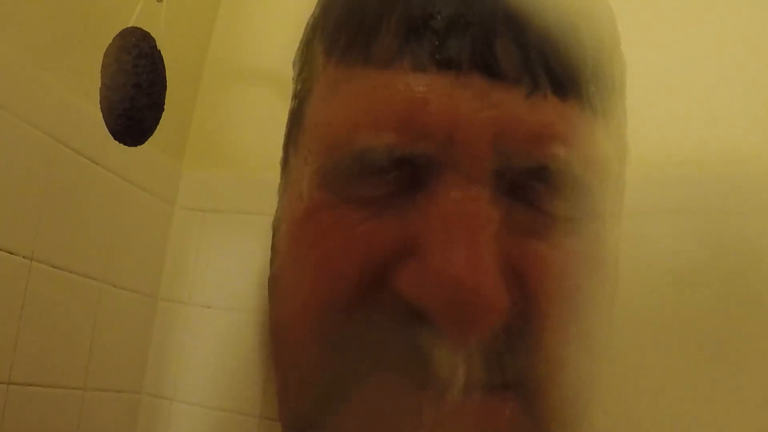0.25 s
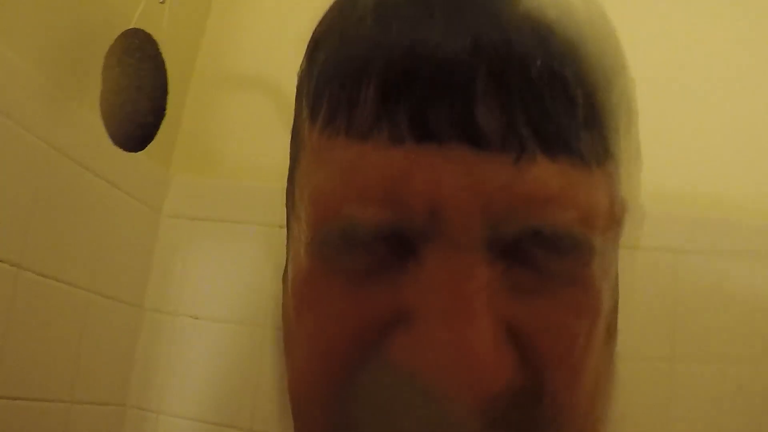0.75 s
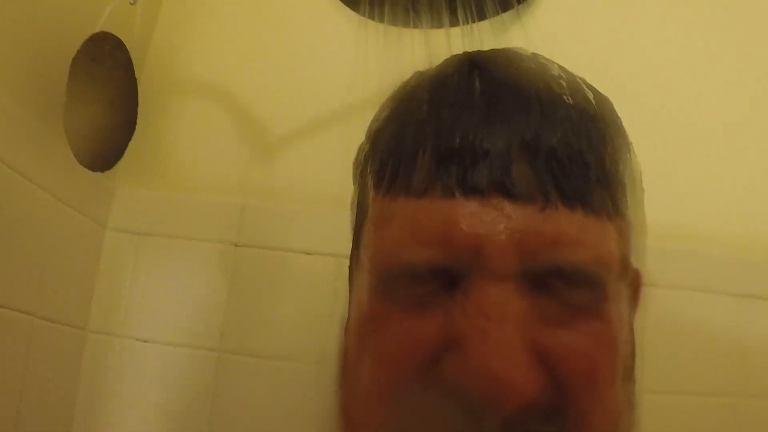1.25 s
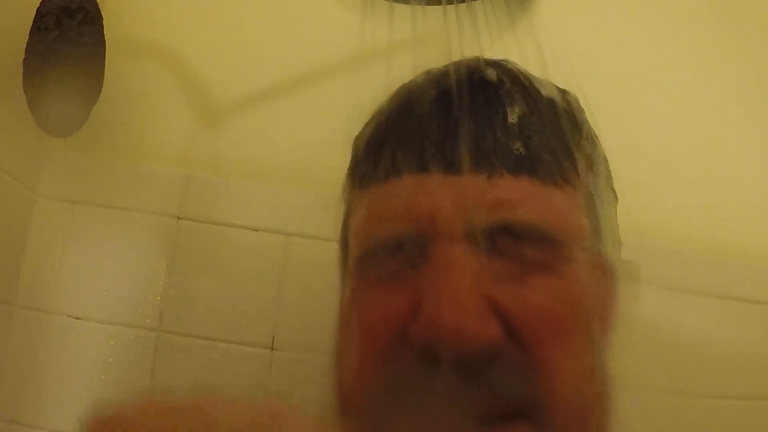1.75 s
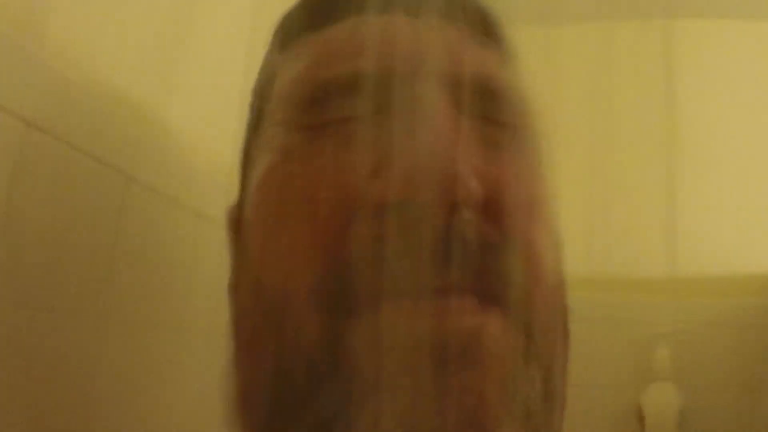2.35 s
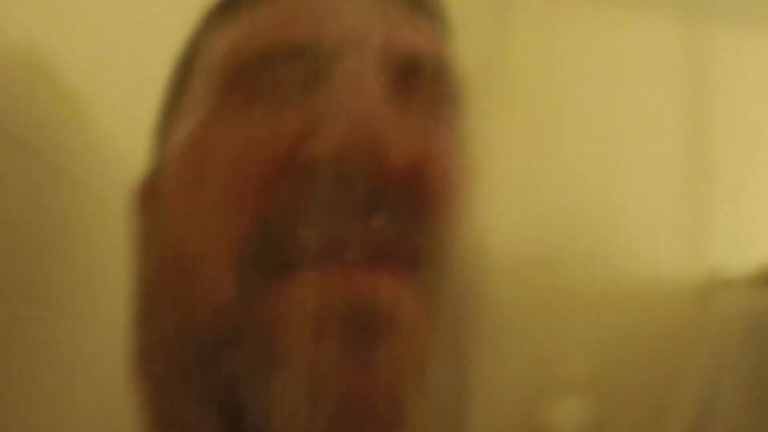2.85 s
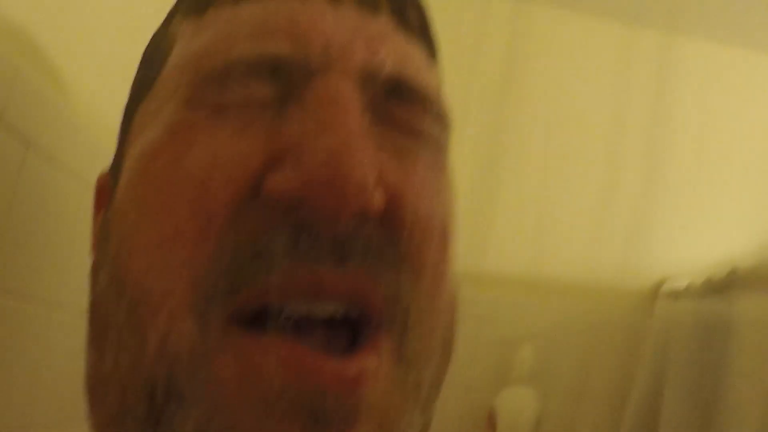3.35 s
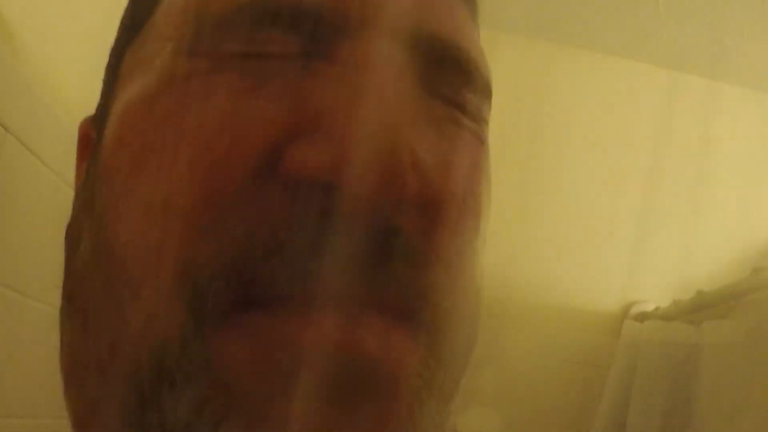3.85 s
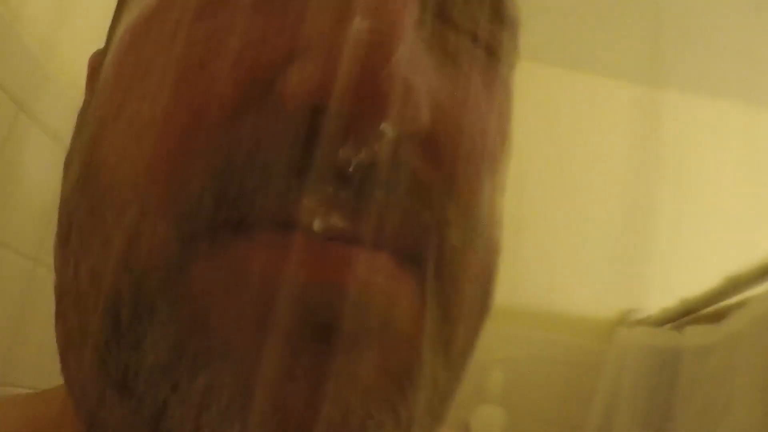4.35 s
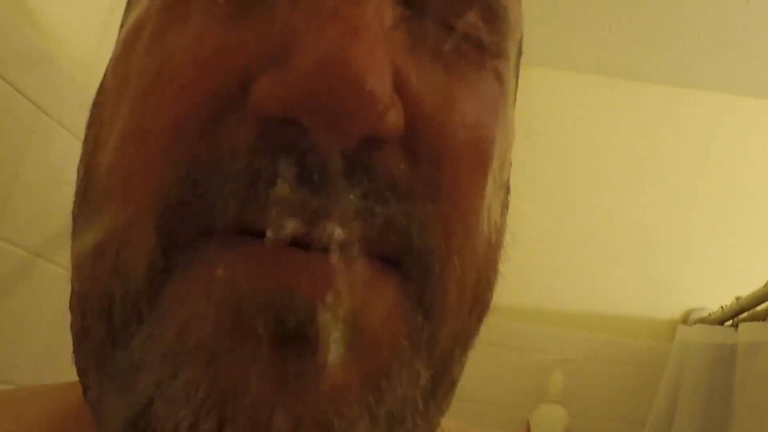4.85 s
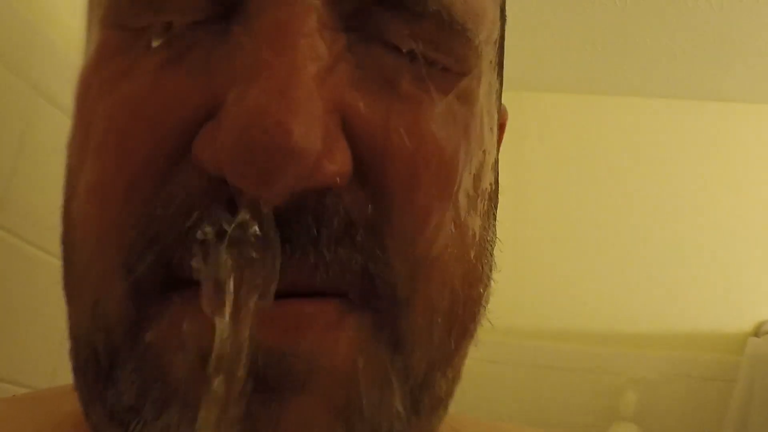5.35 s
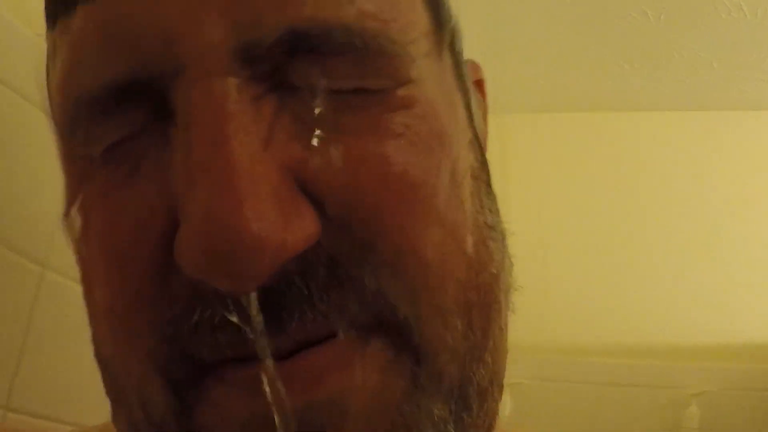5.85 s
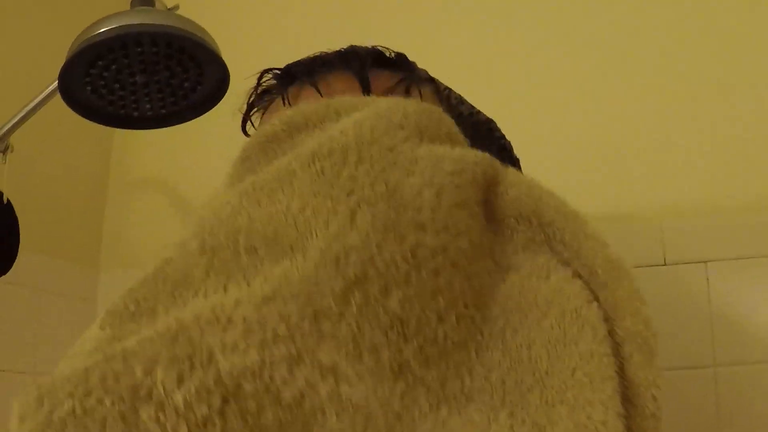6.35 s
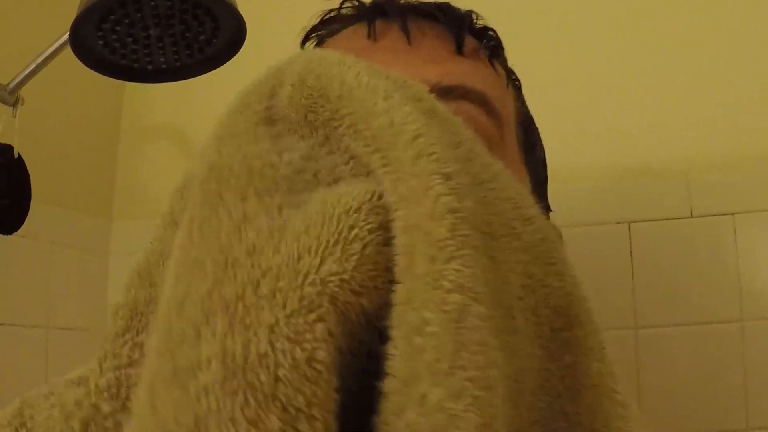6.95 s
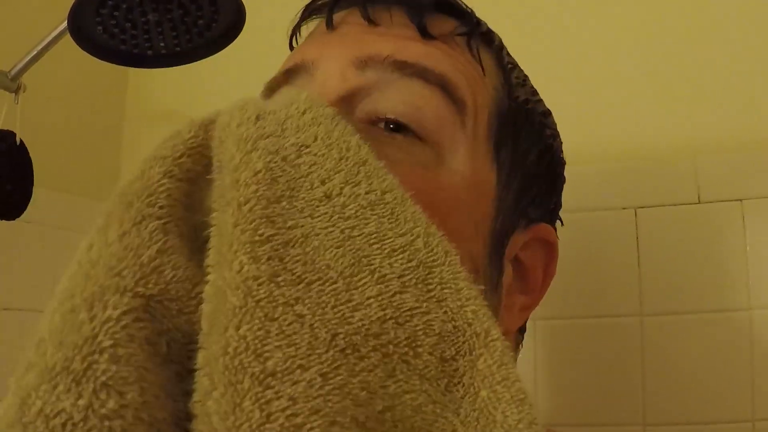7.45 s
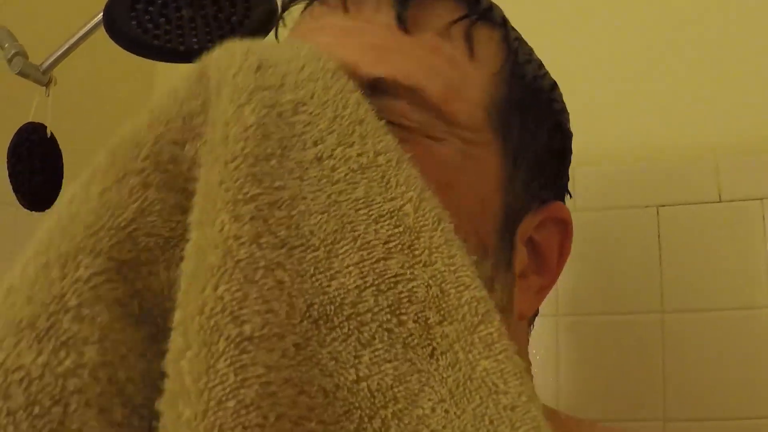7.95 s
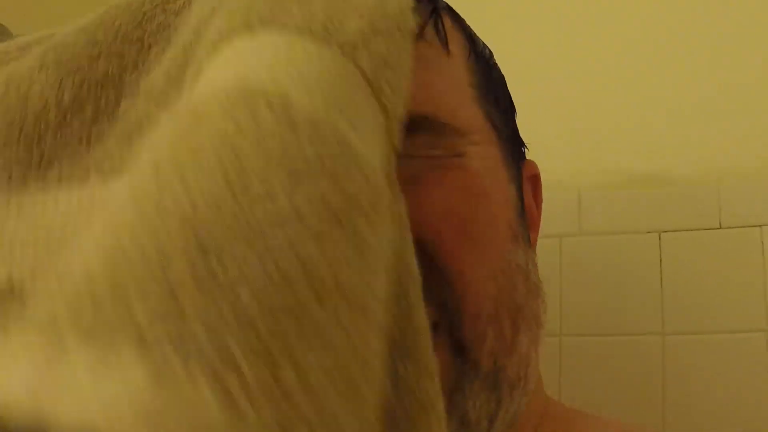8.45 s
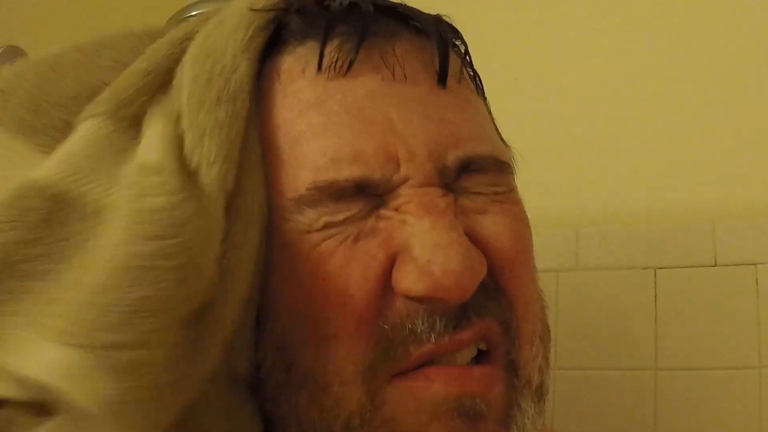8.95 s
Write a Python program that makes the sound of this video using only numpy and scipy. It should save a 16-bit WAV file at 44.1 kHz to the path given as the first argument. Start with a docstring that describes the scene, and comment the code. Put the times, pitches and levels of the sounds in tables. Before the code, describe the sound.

Shower spray hisses and splashes in a tiled stall, water floods the microphone into gurgling muffle, then cuts to soft towel rubbing over fan drone.

```python
"""Tiled shower stall, a small camera held inside. Spray on head and tub is shaped noise; water then drenches
both microphone ports, which gurgle, ring and go dull under a film; splashes are band-noise bursts, drips and
bubbles damped sines, plops membrane swings. At 6.08 s it cuts to water off: a towel rubs hair (shaped noise).
An extractor fan drones throughout in the stall's low modes (noise, motor tones). The camera is mono from 4.2
to 7.4 s."""
import sys
import numpy as np
from scipy import signal
from scipy.fft import rfft, irfft, next_fast_len
from scipy.io import wavfile
from scipy.ndimage import uniform_filter1d, minimum_filter1d, map_coordinates

SR = 44100
rng = np.random.default_rng(int(sys.argv[2]) if len(sys.argv) > 2 else 0)


def put_to_file(sound):
    """Save the sound as 16-bit audio at rate SR, in the file named by the first command-line argument."""
    columns = np.atleast_2d(sound).T  # one column per channel
    safe = np.clip(columns, -1, 1)
    whole_steps = np.round(safe * 32767)
    wavfile.write(sys.argv[1], SR, whole_steps.astype(np.int16))


N = 405708
SIZE = 512  # STFT window [samples]
HZ, TIME, _ = signal.stft(np.zeros(N), SR, nperseg=SIZE)

WET_S = (2.3, 6.08)  # water is on the ports
WETTING_S = (2.52, 2.66)  # the ports fill with water
BRIDGE_S = 3.62  # a water bridge joins the ports in the treble
THICKEN_S = (4.36, 5.8)  # the film thickens

# water running over the ports: (time [s], port ring [dB], body over ring [dB], low over ring [dB],
# push-pull ring [Hz])
DRENCH_FLOW = [(2.22, -46, -2, 9, 1290), (2.33, -42, 9, 11, 1280), (2.45, -32, -3, -1, 1350),
               (2.55, -28.5, 9, -7, 1400), (2.62, -28, -1, -13, 1340), (2.69, -23, -11, -16, 1090),
               (2.8, -22.5, -13, -14, 1058), (2.87, -28.5, -13, -8, 1300), (3.06, -31, -5, -2, 1270),
               (3.11, -34.5, 8, -1, 1320), (3.17, -32.5, 9.5, 3, 1280), (3.23, -33, 8.5, 3.5, 1260),
               (3.29, -26.5, 1, -14, 1420), (3.56, -27, 1, -11.5, 1420), (3.62, -24, 4.5, -22, 1320),
               (3.66, -18.5, -2.5, -19, 1120), (3.72, -20.5, -1.5, -15.5, 1070), (3.78, -22, -8, -14, 1050),
               (3.83, -24, -2, -7, 1020), (3.87, -22.5, -4, -1, 940), (3.92, -29.5, 8, 3, 900),
               (3.97, -25.5, 8.5, 0.5, 1060), (4.05, -30.5, 10, 4.5, 907), (4.144, -32.5, 12, 2.5, 945),
               (4.2, -51.5, -1, 15, 1010)]
# the shower through a water film: (time [s], level [dB])
FILM_FLOW = [(4.17, -48), (4.5, -46), (4.7, -42.5), (5.09, -41.5), (5.3, -40), (5.55, -44), (5.65, -46),
             (5.75, -43), (5.86, -41), (5.93, -42.5), (6.0, -43.5), (6.09, -43.5)]


def amp(db):
    """Amplitude factor of a level in dB."""
    return 10 ** (np.asarray(db) / 20)


def ramp(t, span, ends):
    """From the first value to the second across a time span."""
    return np.interp(t, span, ends)


def along(points, hz):
    """(Hz, value) points read on a log axis."""
    f, v = np.transpose(points)
    return np.interp(np.log(hz + 1), np.log(f + 1), v)


def curves(rows, t):
    """Each column after the time, read at t; the first is silent outside the table."""
    s, level, *rest = np.transpose(rows)
    return [np.interp(t, s, level, -200, -200)] + [np.interp(t, s, c) for c in rest]


def filtered(x, response):
    """x times a response of frequency."""
    m = next_fast_len(N + SR // 2)
    return irfft(rfft(x, m) * response(np.fft.rfftfreq(m, 1 / SR)), m)[..., :N]


def muffled(x, top_hz):
    """A steep loss above top_hz."""
    return filtered(x, lambda f: 1 / (1 + (f / top_hz) ** 6))


def lumps(rate, depth_db):
    """A smooth random gain for each port, rate knots a second, of mean power 1."""
    knots = rng.standard_normal((2, int(N * rate / SR) + 4))
    at = np.arange(N) * rate / SR
    gain = amp(depth_db * np.array([map_coordinates(k, [at]) for k in knots]))
    return gain / np.sqrt(np.mean(gain ** 2))


def bump(hz, octaves):
    """A bell of height 1 on log frequency."""
    return np.exp(-(np.log2((HZ[:, None] + 1) / hz) / octaves) ** 2)


def step(hz, octaves):
    """0 below hz, rising to 1 over some octaves."""
    return np.clip(np.log2((HZ[:, None] + 1) / hz) / octaves, 0, 1)


def over(tone, lo_hz, hi_hz):
    """A spectrum in dB, scaled to power 1 between the edges."""
    db = along(tone, HZ)[:, None]
    power = np.sum(amp(db[(HZ > lo_hz) & (HZ < hi_hz)]) ** 2)
    return db - 10 * np.log10(power / len(HZ))


def apart(alike):
    """Side over mid in dB for a left-right likeness."""
    c = np.clip(along(alike, HZ), -.95, .98)[:, None]
    return 10 * np.log10((1 - c) / (1 + c))


def rush(mid_db, side_db, lean_db, patchy_db, turn=0):
    """Stereo noise from a moving spectrum, with patches of random gain; the left leads by turn radians."""
    mid, side = signal.stft(rng.standard_normal((2, N)), nperseg=SIZE)[2]
    field = uniform_filter1d(rng.standard_normal(mid.shape), size=14, axis=0)
    field = uniform_filter1d(field, size=5, axis=1)
    gain = amp(mid_db + patchy_db * field / field.std())
    mid, side = mid * gain, side * amp(side_db) * gain
    left = (mid + side) * amp(lean_db / 2) * np.exp(.5j * turn)
    right = (mid - side) * amp(-lean_db / 2) * np.exp(-.5j * turn)
    return signal.istft(np.array([left, right]), nperseg=SIZE)[1][:, :N]


def fan():
    """Air noise and motor tones, lifted at the modes of the stall; water on the ports mutes the deep part less."""
    # air and tones above the deep part, at the ports: (time [s], level [dB])
    fan_level = [(0.0, -24.5), (0.33, -25.5), (0.92, -24), (1.61, -28.5), (1.92, -25), (2.56, -33),
                 (3.12, -47), (3.25, -58), (3.43, -44), (3.82, -45), (4.0, -35), (4.15, -45), (4.23, -44.5),
                 (5.53, -36), (5.87, -31), (6.25, -30), (6.4, -28), (8.5, -28.5), (9.2, -27)]
    # (frequency [Hz], density [dB per Hz])
    air_tone = [(12, -35), (22, 10), (90, 4), (135, 1), (185, -8), (240, 1), (330, -9.5), (420, -12),
                (720, -12.5), (1000, -19.5), (1300, -54), (2200, -120)]
    # low modes of the stall: (frequency [Hz], width [Hz], lift before the turn [dB], lift after [dB])
    stall_modes = [(77, 4.5, -1, 3.5), (118, 6.1, -3, 7.5), (140, 14, -0.5, -1), (163.3, 12, 8.5, 2),
                   (210.3, 11.3, 11, 6), (224.6, 20.7, 5, 12.5), (259.5, 12, 5.5, 2.5), (284, 7.1, 11.5, 8),
                   (309, 10, -16, 5.5), (313.6, 9.6, 11, 10), (331, 7.1, 5.5, 10), (343, 10.4, 16, 11),
                   (366, 12, 10, 5.5), (388, 13, 1, 5.5), (415, 6.1, 16.5, -14), (411, 12, 1.5, 4),
                   (457, 9, 7, -2), (450, 9.2, 2.5, 14), (480.5, 11, 13, 5.5), (541, 13, 6.5, 8.5),
                   (567, 13, 7.5, 3), (687, 9, 1, 3)]
    # motor tones: (frequency [Hz], level re air before the turn [dB], level re air after [dB])
    motor_tones = [(75.3, -11.5, -7.5), (119.2, -9, -12), (163.2, -19.5, -9), (208.8, -9.5, -10),
                   (284.6, -21.5, -7.5), (298.4, -42, -12), (313.8, -18, -16), (328, -14.5, -15.5),
                   (347, -16.5, -18.5), (391, -29, -18), (449.4, -18.5, -43)]
    # deep part's gain under the film: (time [s], level [dB])
    deep_swell = [(4.4, -4), (5.0, -0.5), (5.6, 1), (6.1, -6)]
    turn_s = (4.44, 4.73)  # the camera turns and sits elsewhere among the modes
    dry_fan_db, deep_base_db = -23, -5  # fan level at dry ports; deep part before loss and swell
    deep_passes = 0.5  # share of the loss to water that the deep part escapes
    lean_db = 0.5  # left over right

    def response(f):
        lift = sum(np.outer(dbs, 1 / (1 + (2 * (f - c) / w) ** 2)) for c, w, *dbs in stall_modes)
        return amp(along(air_tone, f) + lift)

    t = np.arange(N) / SR
    after = ramp(t, turn_s, (0, 1))
    places = filtered(rng.standard_normal((2, 1, N)), response)
    air = places[:, 0] * (1 - after) + places[:, 1] * after
    waver = np.cumsum(rng.standard_normal((len(motor_tones), N // 64 + 2)), axis=1) * 0.0703  # [rad]
    tones = np.zeros(N)
    for (hz, *dbs), w in zip(motor_tones, waver):
        drift = np.interp(t, np.arange(len(w)) * 64 / SR, w)
        tones += amp(ramp(t, turn_s, dbs)) * np.sin(2 * np.pi * hz * t + drift)
    air[0] += tones * air[0].std() * np.sqrt(2)
    deep = muffled(air, 150)
    db, = curves(fan_level, t)
    deep_db = deep_base_db + deep_passes * (dry_fan_db - db) + np.interp(t, *np.transpose(deep_swell))
    rest = air - deep
    mid, side = amp(db) * (rest + amp(deep_db) * deep) / rest[0].std()
    return np.array([(mid + 0.046 * side) * amp(lean_db / 2), (mid - 0.065 * side) * amp(-lean_db / 2)])


def tiles(x):
    """The tiled walls answer with a short tail, which ripples the spectrum."""
    t = np.arange(SR // 4) / SR
    tail = rng.standard_normal(len(t)) * amp(-60 * t / .3)  # T60 0.3 s
    wet = signal.fftconvolve(x, tail[None] / np.linalg.norm(tail), axes=1)[:, :N]
    return .9 * x + .5 * filtered(wet, lambda f: 1 / (1 + (f / 2500) ** 2))


def grip():
    """The holding hand shakes the case: noise mostly below 100 Hz, unrelated at the two ports."""
    # before the port offsets: (time [s], level [dB])
    grip_level = [(0, -48), (.25, -33), (2.2, -49), (4.2, -42.5), (7.3, -30.5), (9.2, -34)]
    low = filtered(rng.standard_normal((2, N)), lambda f: f / (f + 14) / (1 + (f / 70) ** 2))
    return amp(curves(grip_level, np.arange(N) / SR)[0]) * amp([[-4], [4]]) * low / low.std()


def towel():
    """Soft rubbing; the fibres ring the case resonances when the cloth comes near."""
    # towel on hair and the stall's air: (time [s], rub [dB], fibres over rub [dB])
    rubbing = [(6.08, -41, 1.5), (6.8, -39.5, 2.5), (7.5, -42, 3), (8.1, -43.5, 11.5), (8.3, -41.5, 15.5),
               (8.92, -38.5, 15.5), (9.2, -39.5, 16.5)]
    # (frequency [Hz], density [dB per Hz])
    rub_tone = [(260, -78), (450, -2), (742, -5.5), (886, -12.5), (1060, -4), (1500, -13), (2340, -17),
                (3010, -22.5), (4410, -25.5), (5340, -34), (9910, -36.5), (15200, -54)]
    # (frequency [Hz], left-right likeness [-1..1])
    rub_alike = [(60, 0.13), (120, 0.69), (240, 0.98), (470, 0.49), (940, 0.092), (1870, 0.17),
                 (3720, 0.63), (7400, 0.054), (14700, 0.2)]
    # (frequency [Hz], left over right [dB])
    rub_lean = [(300, -2), (1400, 2.5), (2800, -1), (5600, 1), (11000, -1.5)]
    # light brushes of the cloth edge: (time [s], peak density [dB])
    brushes = [(7.5587, -58), (7.7533, -48), (8.1294, -57)]
    rub_db, fibre_db = curves(rubbing, TIME)
    case = bump(5940, 0.3) + 0.4 * bump(3330, 0.13) + 0.13 * bump(1300, 0.1)
    case = case + 0.18 * bump(1680, 0.052) + 0.18 * bump(4070, 0.14) + .35 * bump(13500, 0.31)
    power = amp(over(rub_tone, 700, 2800) + rub_db + case * fibre_db) ** 2
    for s, db in brushes:
        power = power + amp(db) ** 2 * bump(10000, 0.86) * np.exp(-((TIME - s) / .012) ** 2)
    return rush(10 * np.log10(power), apart(rub_alike), along(rub_lean, HZ)[:, None], patchy_db=.5)


def wet_hiss():
    """A faint even treble hiss above the dull film, growing as the film thickens."""
    hiss_db = (-70, -62)  # thin film, thick film
    db = np.where((TIME > 4.17) & (TIME < WET_S[1]), ramp(TIME, THICKEN_S, hiss_db), -200)
    tone = along([(5000, -30), (7000, 0), (9000, 1), (11000, -7)], HZ)[:, None]
    return rush(db + tone, -54, 0, patchy_db=1.5)


def film():
    """The shower through the film: noise with a port ring that grows while the low part fades."""
    # (frequency [Hz], density [dB per Hz])
    film_tone = [(260, -39), (450, 13), (469, -9), (511, 2), (757, 1.5), (836, 0.5), (1510, -4.5),
                 (1850, -2), (2250, -0.5), (2550, -3), (3050, -2.5), (3800, -10.5), (5210, -13),
                 (6250, -17.5), (7300, -33.5), (13000, -40)]
    # the port ring moves as water drains from the cavity: (time [s], frequency [Hz])
    film_ring = [(5.0, 1380), (5.55, 1340), (5.66, 1620), (5.82, 1560), (5.9, 1400), (6.09, 1480)]
    db, = curves(FILM_FLOW, TIME)
    ring_db, low_db = ramp(TIME, THICKEN_S, (6, 12)), ramp(TIME, THICKEN_S, (5.5, -15))
    ring = bump(np.interp(TIME, *np.transpose(film_ring)), 0.34)
    shape = over(film_tone, 1900, 3370) + db + ring * ring_db + bump(700, 0.33) * low_db
    return lumps(40, depth_db=1.36)[0] * rush(shape, -54, 0, patchy_db=1.0)


def gap(x):
    """The thickening film takes out the band between two edges, with a slight lift just below it."""
    # (time [s], lower edge [Hz], upper edge [Hz], depth [dB])
    film_gap = [(4.95, 5000, 5000, 13), (5.0, 4340, 5500, 13), (5.1, 3850, 5900, 10), (5.2, 3800, 6300, 9),
                (5.26, 4200, 7450, 10), (5.5, 4080, 7350, 5), (5.65, 3480, 7060, 4.5),
                (6.09, 3570, 7400, 4)]
    s, *columns = np.transpose(film_gap)
    lo_hz, hi_hz, depth_db = [np.interp(TIME, s, c, 0, 0) for c in columns]
    inside = np.clip(np.minimum((HZ[:, None] - lo_hz) / 250, (hi_hz - HZ[:, None]) / 600), 0, 1)
    lip = 0.19 * bump(np.abs(lo_hz - 150) + 1, 0.065)
    bins = signal.stft(x, nperseg=SIZE)[2] * amp(depth_db * (lip - inside))
    return signal.istft(bins, nperseg=SIZE)[1][:, :N]


def grains(count, span, low_hz, octaves, cycles, over_film_db, over_drench_db):
    """Short damped sines, sliding up from random pitches at random times; their level follows the flow."""
    s, pitch, size = rng.random((count, 3)).T
    s = span[0] + (span[1] - span[0]) * s
    hz = (low_hz * 2 ** (octaves * pitch))[:, None]
    t = np.arange(400) / SR
    flow_db = np.maximum(curves(FILM_FLOW, s)[0] + over_film_db, curves(DRENCH_FLOW, s)[0] + over_drench_db)
    flow_db = flow_db - 3 * np.log(1 - .97 * size)  # a few are much louder
    life = cycles / hz
    grain = amp(flow_db)[:, None] * t / life * np.exp(1 - t / life) * np.sin(2 * np.pi * hz * t * (1 + 12 * t))
    at = np.round(s * SR).astype(int)[:, None] + np.arange(400)
    return np.bincount(at.ravel(), grain.ravel(), N)[:N]


def crackle():
    """Sparse clicks about a cycle long as the water film breaks."""
    return grains(count=400, span=WET_S, low_hz=2190, octaves=0.91, cycles=0.34, over_film_db=4,
                  over_drench_db=-7)


def droplets():
    """Small bubbles of a few cycles burst in the water on the ports."""
    return grains(count=1300, span=WET_S, low_hz=1230, octaves=1.74, cycles=1.1, over_film_db=0.5,
                  over_drench_db=-9.0)


def bubbles():
    """Fewer, longer bubbles that slide up in pitch."""
    return grains(count=220, span=WET_S, low_hz=1220, octaves=1.31, cycles=4.4, over_film_db=1.0,
                  over_drench_db=-14.5)


def drips():
    """A drop is a high tick of a few cycles, a slap on the film, a knock on the case and a contact click."""
    # drips on the case: (time [s], tick [dB], pitch [Hz], slap over tick [dB], knock over tick [dB])
    drip_hits = [(2.918, -26, 3400, -2, -10), (2.943, -24, 4200, 1, -10), (2.96, -22, 3200, -8, -10),
                 (2.976, -25, 3600, -6, -10), (3.048, -34, 6140, -1, -8), (4.338, -38, 3500, 0, 10),
                 (4.437, -33, 5000, -8, 1), (4.5044, -30, 5630, 10, 14), (4.536, -36, 5500, 4, 12),
                 (4.563, -39, 4500, 11, 18), (4.574, -34, 5000, -3, -10), (4.955, -38, 5000, 0, -8),
                 (5.2648, -13, 4370, -20, -10), (5.406, -20, 4960, -27, -24), (5.5, -42, 6500, -3, -4),
                 (5.686, -47, 8500, -2, 0), (5.705, -38, 4000, 0, 17), (5.737, -36, 5500, -2, -2),
                 (5.8037, -34, 3440, 3, -8), (5.558, -40, 3960, 16, 2), (5.768, -36, 2100, -6, -8),
                 (5.637, -40, 2300, -6, -8), (5.662, -38, 2400, -4, -8), (4.785, -54, 9000, -6, -6),
                 (5.966, -35, 3600, 7, 0), (5.898, -42, 8500, -6, -4)]
    out, t = np.zeros(N + SR), np.arange(SR // 40) / SR

    def ping(db, hz, life_s):
        return amp(db) * t / life_s * np.exp(1 - t / life_s) * np.sin(2 * np.pi * hz * t)

    for s, db, hz, slap_db, knock_db in drip_hits:
        tick = ping(0, hz, .00035)
        slap = ping(slap_db, 2600, .00012) + ping(slap_db + 2, 1100, .0003)
        knock = ping(knock_db, 300, .0011)
        click = ping(-21, 9000, .00006)
        out[round(s * SR):][:len(t)] += amp(db) * (tick - slap + knock + click)
    return out[:N]


def splashes():
    """Each splash of a broken jet is a quick burst of ragged band noise; wet ports lose its top and width."""
    # (time [s], level [dB], centre [Hz], T60 [s], width [octaves])
    jet_splashes = [(.0094, -18.5, 5870, 0.14, 0.58), (.131, -26, 5100, 0.43, 0.051),
                    (.1344, -18, 6500, 0.2, 0.3), (.2034, -20.5, 6200, 0.17, 0.38),
                    (0.4088, -25, 5540, 0.16, 0.1), (.4088, -25.5, 3420, .2, .4),
                    (.4843, -22, 5660, 0.2, .08), (0.484, -22, 3300, 0.13, 0.34),
                    (0.709, -21.5, 5000, 0.38, 0.6), (0.7332, -19, 6600, .2, 0.31),
                    (0.742, -20.5, 3800, 0.24, 0.3), (0.854, -26, 6100, .3, 0.2),
                    (1.309, -22.5, 3300, 0.43, 0.53), (2.3685, -22.5, 3540, 0.57, 1),
                    (2.5402, -28, 5800, 0.3, 0.74), (2.558, -25, 5700, .12, .3),
                    (2.565, -18, 5670, 0.1, 0.16), (2.571, -18, 6250, 0.081, 0.19),
                    (2.58, -27, 5700, 0.078, 0.15), (3.899, -33, 3300, 0.087, 0.78),
                    (3.926, -25.5, 3170, 0.097, .97), (3.988, -29, 3380, 0.077, .97),
                    (4.054, -32, 3000, .08, 0.59), (4.129, -28.5, 3180, 0.091, 1),
                    (4.239, -34.5, 2900, 0.12, 0.32), (4.295, -37.5, 3370, 0.28, 0.68),
                    (4.4922, -34, 3300, .05, .3), (4.52, -41, 4400, 0.15, 0.37),
                    (4.544, -32.5, 2620, 0.18, 0.59), (4.6234, -36, 2960, 0.19, 0.27),
                    (4.645, -31.5, 3070, 0.17, 0.79), (4.806, -39.5, 3170, 0.2, .6),
                    (4.885, -29, 3100, 0.22, 0.73), (4.9387, -35, 3020, 0.16, 0.42),
                    (4.9875, -33, 3100, 0.076, 0.39), (5.0576, -33, 2800, .07, 0.45),
                    (5.0973, -33, 2120, .15, .3), (5.1393, -31, 2500, .08, 0.32),
                    (5.251, -36, 4220, 0.16, .6), (5.3048, -33, 3840, 0.12, 0.42),
                    (5.3906, -27.5, 2380, 0.035, 0.23), (5.4275, -48, 2700, 0.042, .4),
                    (5.5556, -31, 2980, 0.035, 0.43), (5.6605, -40, 2580, 0.036, 0.31),
                    (5.702, -26, 2960, 0.12, 0.23), (5.728, -32, 3300, .06, .2), (5.88, -33, 2700, .04, .3),
                    (5.737, -30, 2600, .07, .6), (5.7668, -33, 3000, 0.095, 0.37),
                    (5.8027, -23, 2600, 0.073, 0.65), (5.825, -33.5, 3200, .2, .4),
                    (5.933, -34, 3100, 0.27, 0.38), (5.966, -33, 3000, 0.11, .5),
                    (6.059, -36, 2900, .06, 0.36), (6.0742, -32, 2680, 0.064, 0.26)]
    rise_s, skirt_db = 0.0011, -28  # skirt: faint wide spray above each band
    dull_db, side_db = (0, -23), (-3.5, -33)  # top, dry and wet ports; side, before and after the bridge
    out, t = np.zeros((2, N + SR)), np.arange(SR // 3) / SR
    f = np.fft.rfftfreq(len(t), 1 / SR) + 1
    top = np.clip(np.log2(f / 5300), 0, 1)
    for s, db, hz, t60, octaves in jet_splashes:
        band = np.exp(-(np.log2(f / hz) / octaves) ** 4 / 2) * amp(top * ramp(s, WETTING_S, dull_db))
        band = band + amp(skirt_db) * (f > hz) / (1 + (f / 8500) ** 6)
        mid, side = irfft(rfft(rng.standard_normal((2, len(t)))) * band, len(t))
        side = side * amp(side_db[int(s > BRIDGE_S)])
        shape = amp(db - 60 * t / t60) * (1 - np.exp(-t / rise_s)) / mid.std()
        out[:, round(s * SR):][:, :len(t)] += shape * np.array([mid + side, mid - side])
    return lumps(150, depth_db=1.5)[0] * out[:, :N]


def plops():
    """Fat drops landing on a port: each swings the membranes for about a cycle."""
    # (crest time [s], right-port peak [dB], left swing over right [signed ratio], pitch [Hz])
    fat_drops = [(0.132, -4, 0, 205), (0.259, -22, -1.5, 205), (0.71, -24, 1.5, 205), (0.9, -21, 3, 205),
                 (0.998, -12, 0.5, 205), (1.235, -17, 0, 205), (2.27, -15.5, 1.5, 75),
                 (2.945, -20, 5.5, 170), (3.001, -25, 4, 190), (3.051, -22, -3.5, 110),
                 (3.098, -11, 0.5, 190), (3.805, -17, 1, 110), (3.822, -15, 0, 140), (3.869, -26, -12, 120),
                 (3.906, -28, -8, 130), (3.922, -31, 10, 75), (3.966, -31, 6, 100), (8.374, -20, -0.5, 204),
                 (8.784, -20, 1.8, 205), (9.003, -30, -3, 205), (9.087, -31, 3, 205)]
    out, t = np.zeros((2, N + SR)), np.arange(-1200, 1200) / SR
    for s, db, left, hz in fat_drops:
        swing = np.exp(-(t * hz / 0.49) ** 2) * np.cos(2 * np.pi * hz * t)
        out[:, round((s + t[0]) * SR):][:, :len(t)] += amp(db) * np.outer([left, 1], swing)
    return out[:, :N]


def thumps():
    """Slugs of water thump the membranes: lumpy low noise, unrelated from port to port, swells, holds, drains."""
    # (hold start [s], hold [s], level [dB], left over right [dB])
    slugs = [(0.115, 0.023, -25, -9), (.9, 0.14, -32, -9), (1.24, .03, -29.5, -12), (2.243, .01, -24, 2),
             (2.306, 0.09, -19, -3), (2.41, 0.018, -20, -2), (2.443, 0.072, -19, 1),
             (2.521, .07, -20.5, -1.5), (2.6, .07, -22, 8), (2.698, 0.11, -24, 5.5),
             (2.895, .03, -28.5, 10), (2.935, 0.01, -25.5, 13), (3.0, .01, -27, 8), (3.052, 0.018, -27, 11),
             (3.097, .01, -27, 8), (3.158, 0.048, -29.5, 14), (3.318, 0.0089, -31, 0),
             (3.425, 0.026, -41.5, 18), (3.602, .02, -34, -4), (3.808, 0.032, -22.5, 2.5),
             (3.865, 0.056, -25.5, 12), (3.96, .01, -28, 13), (4.02, 0.03, -32, 14), (4.151, .01, -29, 9),
             (5.02, 0.16, -32, 0), (5.288, .04, -39, -10), (5.792, 0.25, -26.5, 8.5)]
    # (frequency [Hz], density [dB per Hz])
    thump_tone = [(8.8, -39), (15, -5.5), (108, -1), (157, -2), (224, -4.5), (308, -10), (700, -31),
                  (910, -50), (1540, -120)]
    rise_db_per_s, fall_db_per_s = 246, 247
    t = np.arange(0, N + 64, 64) / SR
    power = 0
    for s, hold, db, lean_db in slugs:
        port_db = db + np.array([[lean_db], [-lean_db]]) / 2
        rise_db = rise_db_per_s * np.maximum(s - t, 0)
        fall_db = fall_db_per_s * np.maximum(t - s - hold, 0)
        power = power + amp(port_db - rise_db - fall_db) ** 2
    low = filtered(rng.standard_normal((2, N)), lambda f: amp(along(thump_tone, f)))
    level = np.repeat(np.sqrt(power), 64, axis=1)[:, :N]
    return level * lumps(34, depth_db=1.8) * low / low.std()


def upper_ring():
    """Lift in dB of a second, higher ring of the ports that drifts with the water in them."""
    # (time [s], lift [dB], frequency [Hz])
    second_ring = [(0, -0.5, 2600), (1.25, -1.5, 2900), (1.45, 2, 2800), (1.78, 4, 2400), (2.0, 2, 2400),
                   (2.2, 0.5, 2900), (3.05, 0.5, 3100), (3.13, 1, 3000), (3.27, 6, 2550), (3.45, 4, 2200),
                   (3.62, 6.5, 2250), (3.75, 3.5, 2300), (3.95, 1.5, 2710), (9.2, 0, 2700)]
    lift_db, hz = curves(second_ring, TIME)
    return np.maximum(lift_db, 0) * bump(hz, 0.19)


def spray():
    """Dense drops on head and tub, as noise; as the ports fill, the top goes and the treble leans left."""
    # through clear ports: (time [s], patter [dB], treble hiss over patter [dB], port ring over patter [dB])
    spray_level = [(0, -24.5, -3, 0), (.18, -31.5, 2.5, 6), (.44, -30, -3.5, 6), (.63, -30.5, -0.5, 2.5),
                   (.91, -27, -3, 3.5), (1.3, -27.5, -3, 4), (1.49, -27, -3.5, 6), (1.96, -27, -2.5, 1),
                   (2.23, -26.5, 1.5, -4), (2.34, -36, 6.5, -5), (2.5, -34, 1.5, 1), (2.56, -31, 6, -9),
                   (2.62, -37, 6, 0), (2.82, -36, -9.5, 8), (3.0, -41.5, -10, 11), (3.15, -57, 5, 6)]
    # (frequency [Hz], density [dB per Hz])
    spray_tone = [(240, -10.5), (400, -1), (661, -15.5), (1110, -7.5), (1200, -5.5), (1310, -11),
                  (1440, -4), (1800, -8), (2370, -6.5), (4100, -9), (6190, -2), (7540, -8.5), (11400, -26),
                  (13400, -24.5), (15200, -35)]
    # (frequency [Hz], left-right likeness [-1..1])
    spray_alike = [(60, 0.5), (110, 0.73), (200, 0.8), (380, 0.99), (690, 0.2), (1280, 0.36), (2350, 0.5),
                   (4340, 0.74), (6500, 0.087), (9000, -0.2), (14700, 0.3)]
    # (frequency [Hz], left over right [dB])
    spray_lean = [(60, -7), (180, -3), (540, -2), (1630, 2.5), (4900, -4), (7500, -2.5), (10000, -8.5),
                  (14700, -2)]
    # top octave: (time [s], level [dB])
    spray_top = [(0, -27), (2.36, -25), (2.6, -47.5), (2.9, -68), (3.15, -86)]
    patter_db, hiss_db, ring_db = curves(spray_level, TIME)
    top_db, = curves(spray_top, TIME)
    treble_lean_db = ramp(TIME, WETTING_S, (4, 16))
    top, treble = step(6050, 1.0), step(2970, 0.79)
    shape = over(spray_tone, 2000, 4530) + (1 - top) * patter_db + (treble - top) * hiss_db + top * top_db
    shape = shape + bump(1350, 0.52) * ring_db + upper_ring()
    lean_db = along(spray_lean, HZ)[:, None] + treble * treble_lean_db
    return rush(shape, apart(spray_alike), lean_db, patchy_db=1.36)


def drench():
    """Water rings the port cavities; in the lower range it pushes one membrane as it pulls the other."""
    # (frequency [Hz], density [dB per Hz])
    drench_tone = [(180, -45), (300, -14), (380, 0.5), (714, -1), (1000, 0.5), (1500, 1), (1900, -4.5),
                   (2480, -8), (4450, -20.5), (5290, -19), (6500, -29.5), (7850, -37), (13000, -60)]
    # drifting ring shared by both membranes: (time [s], frequency [Hz], width [octaves])
    shared_ring = [(2.4, 1380, .2), (2.65, 1400, .25), (2.8, 1420, 0.28), (2.95, 1400, .2),
                   (3.1, 1300, 0.18), (3.4, 1490, 0.23), (3.65, 1400, 0.24), (3.8, 1360, .25),
                   (3.92, 1250, 0.26), (4.15, 1250, .3)]
    # fizz in the running water, softer while the port ring is below -38 dB: (time [s], level [dB])
    fizz_level = [(2.8, -45), (2.92, -54), (3.196, -41.5), (3.598, -37), (3.938, -42), (3.992, -37.5),
                  (4.114, -37), (4.2, -49)]
    join_s = (3.2, 3.4)  # the water spreads to both ports
    gurgle_s, gurgle_db = (3.8, 3.88), (.5, 2)  # the flow breaks into gulps as it drains: flutter depth
    ring_db, body_db, low_db, ring_hz = curves(DRENCH_FLOW, TIME)
    s, *columns = np.transpose(shared_ring)
    shared = bump(*[np.interp(TIME, s, c) for c in columns])
    high, fizz = step(1540, 0.9), step(3060, 0.53)
    shape = over(drench_tone, 800, 3500) + ring_db + high * body_db + bump(540, 1.0) * low_db
    shape = shape + 5.5 * shared + upper_ring()
    fizz_db = np.interp(TIME, *np.transpose(fizz_level)) + np.minimum(ring_db + 38, 0)
    shape = (1 - fizz) * shape + fizz * (over(drench_tone, 3460, 7000) + fizz_db)

    side_db = ramp(TIME, join_s, (10, -2.5)) + 8 * (bump(ring_hz, 0.24) - shared) + 7 * bump(786, 0.67)
    side_db = side_db - high * ramp(TIME, join_s, (3, 7)) - fizz * ramp(TIME, join_s, (3, -1.5))
    # once the water bridge joins the ports, the treble loses its side part
    side_db = side_db - step(1730, .3) * np.where(TIME > BRIDGE_S, 33, 0)
    lean_db = ramp(TIME, join_s, (1, 4)) * (1 - high)
    turn = ramp(TIME, join_s, (2.36, 0.025)) * np.minimum(HZ[:, None] / 4000, 1) ** 1.32  # [rad]
    gulps = lumps(110, depth_db=ramp(np.arange(N) / SR, gurgle_s, gurgle_db))[0]
    return gulps * rush(shape, side_db, lean_db, patchy_db=1, turn=turn)


def scene():
    """Every source at the two ports; once they fill, the water sounds are cut steeply above 11.4 kHz."""
    small_grains = muffled(droplets() + bubbles() + crackle(), 5800)
    wet = gap(film() + splashes() + small_grains) + drench() + wet_hiss() + drips()
    dull = filtered(wet, lambda f: 1 / (1 + (f / 11400) ** 16))
    filled = ramp(np.arange(N) / SR, WETTING_S, (0, 1))
    at_ports = wet * (1 - filled) + dull * filled
    return fan() + tiles(spray() + towel()) + thumps() + plops() + grip() + at_ports


def record(dry):
    """The camera fades the side signal out and in, limits peaks and keeps nothing above its band limit."""
    # stereo width: (time [s], share of the side signal [0..1])
    side_share = [(0, 1), (4.16, 0.92), (4.21, 0.00079), (7.35, 0), (7.6, 0.42), (8.1, 0.95), (9.2, 1)]
    mid = (dry[0] + dry[1]) / 2
    side = (dry[0] - dry[1]) / 2 * np.interp(np.arange(N) / SR, *np.transpose(side_share))
    pair = np.array([mid + side, mid - side])
    need = np.minimum(1, .85 / (np.abs(pair).max(axis=0) + 1e-9))
    gain = uniform_filter1d(minimum_filter1d(need, size=801), size=400)
    return filtered(pair * gain, lambda hz: hz < 15300)


dry = scene()
out = record(dry)
put_to_file(out)
```